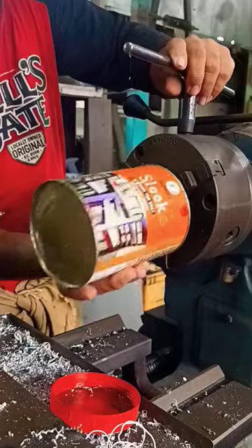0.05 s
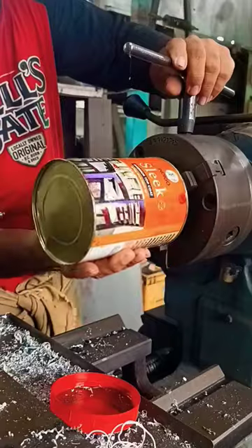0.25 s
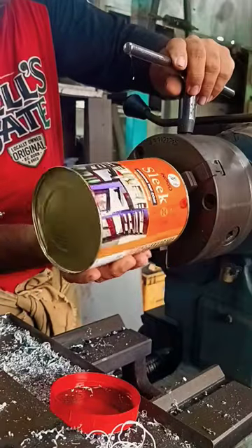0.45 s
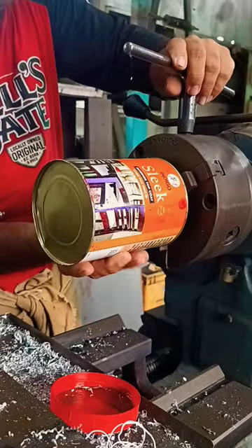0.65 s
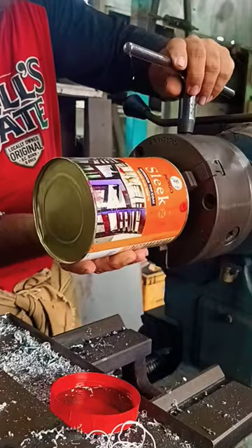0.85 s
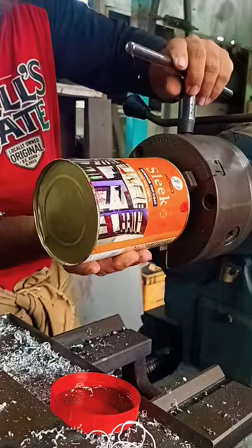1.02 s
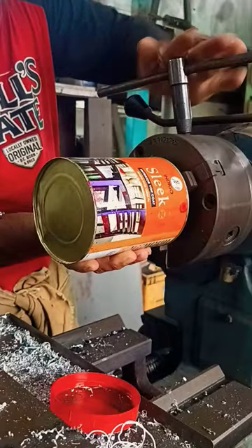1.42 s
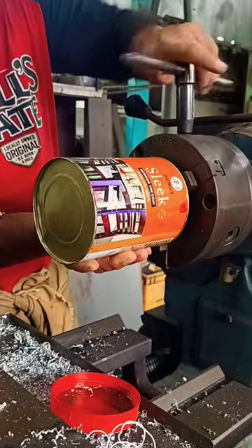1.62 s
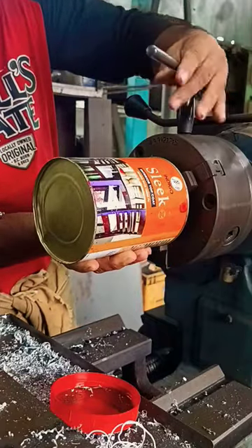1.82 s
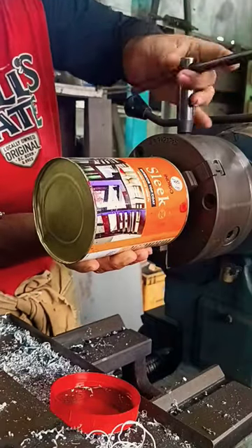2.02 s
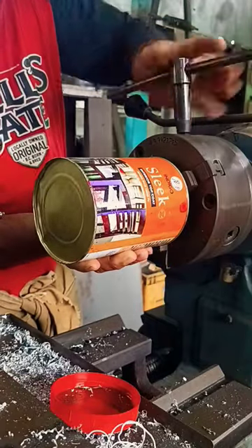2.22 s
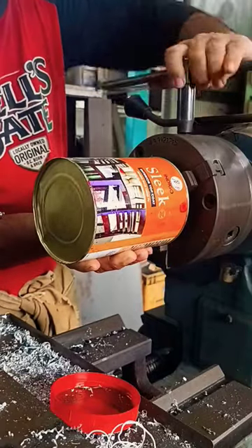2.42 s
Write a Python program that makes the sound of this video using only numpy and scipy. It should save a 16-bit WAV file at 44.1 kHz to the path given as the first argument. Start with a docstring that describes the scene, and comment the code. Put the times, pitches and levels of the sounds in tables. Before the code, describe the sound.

A tin can knocks against steel lathe jaws with hollow clunks, then a key turns quietly.

```python
"""Workshop, close to a standing lathe chuck: a tin can is pushed into the steel jaws.
Each knock gives a hollow thud of the hand-damped can, a clank of steel and a zing of the rim,
which scrapes between knocks. The chuck key turns, closing the jaws on the can with a last clunk
and soft bumps. A hand slides along the key's bar. Low hum and room noise underneath."""
import sys
import numpy as np
from scipy import signal
from scipy.fft import rfft, irfft, next_fast_len
from scipy.io import wavfile
from scipy.ndimage import map_coordinates

SR = 44100
rng = np.random.default_rng(int(sys.argv[2]) if len(sys.argv) > 2 else 0)


def unload_audio(sound):
    """Save the sound as a 16-bit wav file, at the path given as the first command line argument."""
    columns = np.transpose(np.atleast_2d(sound))
    # keep every value between -1 and 1, then stretch to whole-number steps
    steps = np.round(np.clip(columns, -1, 1) * 32767)
    wavfile.write(sys.argv[1], SR, steps.astype(np.int16))


N = 112454

# can against jaws: start_s, thud_db, thud_pitch_hz, thud_hold_s, clank_db, zing_db
KNOCKS = [(0.2238, -13, 361.8, 0.016, -35.5, -35.5), (0.2502, -23, 382, 0.019, -36, -48),
          (0.2984, -21.5, 370, 0.001, -41, -64), (0.4208, -19, 388, 0.0019, -36.5, -47),
          (0.607, -32, 375, 0.0037, -41, -42), (0.6214, -23, 361, 0.0028, -32.5, -70),
          (0.6474, -15.5, 376, 0.0032, -40, -71), (0.715, -12, 367, 0.0016, -19, -49),
          (1.216, -42.5, 425, 0.0024, -45, -63), (1.2262, -32.5, 400, 0.00036, -44, -57),
          (1.2454, -22.5, 371.3, 0.0034, -35.5, -60)]
# metal rubbing on metal: freq_hz, relative_db
RASP_SPECTRUM = [(300, -26), (700, -6), (1050, -3.5), (1650, 3), (2600, -14), (3300, -2), (4800, -12.5),
                 (6000, -9.5), (8000, -18.5), (15000, -27.5)]
# left-right likeness of close sources: freq_hz, correlation
NEAR_CORRELATION = [(300, 0.82), (1500, 0), (5000, 0), (12000, 0.11)]


def amp(db):
    """Decibels to gain."""
    return 10 ** (np.asarray(db) / 20)


def unit_rms(x):
    """Scale to rms 1."""
    return x / np.sqrt(np.mean(x ** 2) + 1e-20)


def curve_at(points, hz):
    """Interpolate (freq_hz, value) points on a log axis."""
    freqs_hz, values = np.transpose(points)
    return np.interp(np.log(hz + 1), np.log(freqs_hz + 1), values)


def clock(start_s=0):
    """Seconds since start_s, zero before it."""
    return np.maximum(np.arange(N) / SR - start_s, 0)


def wobble(knots_per_s):
    """Smooth random curve."""
    return map_coordinates(rng.standard_normal(2048), [clock() * knots_per_s], mode="wrap")


def filtered(x, response):
    """Apply the frequency response response(hz)."""
    size = next_fast_len(N + 8192)
    return irfft(rfft(x, size) * response(np.fft.rfftfreq(size, 1 / SR)), size)[..., :N]


def noise(spectrum):
    """Coloured mono noise, rms 1."""
    return unit_rms(filtered(rng.standard_normal(N), lambda hz: amp(curve_at(spectrum, hz))))


def stereo_noise(spectrum, correlation=NEAR_CORRELATION):
    """Coloured stereo noise, rms 1."""
    def mid_side_gains(hz):
        angle_rad = np.arccos(np.clip(curve_at(correlation, hz), -1, 1)) / 2
        return amp(curve_at(spectrum, hz)) * [np.cos(angle_rad), np.sin(angle_rad)]
    mid, side = filtered(rng.standard_normal((2, N)), mid_side_gains)
    return unit_rms(np.array([mid + side, mid - side]))


def fade(t, t60_s):
    """Exponential decay, 60 dB in t60_s."""
    return np.exp(-np.log(1000) * t / t60_s)


def rise(t, attack_s):
    """Smooth step from 0 to 1."""
    return np.sin(np.pi / 2 * np.clip(t / attack_s, 0, 1)) ** 2


def ring(modes, t, attack_s):
    """Struck metal modes; level and phase vary per blow and per microphone."""
    spread_rad, scatter_db = 0.65, 2
    out, sides = np.zeros((2, N)), np.array([[1], [-1]])
    live = (t > 0) & (t < 0.5)
    age_s = t[live]
    for hz, db, t60_s in modes:
        phase_rad = 2 * np.pi * rng.random() + sides * spread_rad * rng.choice([-1, 1])
        gain = amp(db + scatter_db * rng.standard_normal((2, 1)))
        out[:, live] += gain * fade(age_s, t60_s) * np.sin(2 * np.pi * hz * age_s + phase_rad)
    return out * rise(t, attack_s)


def workshop():
    """Steady room noise and a wavering machine hum."""
    # room noise: freq_hz, relative_db
    air_spectrum = [(25, -41), (60, -14), (110, -9), (143, -2), (175, -9.5), (210, -7.5), (250, -12),
                    (330, -9.5), (600, -11.5), (2600, -13.5), (6300, -21.5), (8000, -26.5), (11000, -28),
                    (15000, -33.5)]
    # its left-right likeness: freq_hz, correlation
    air_correlation = [(60, 0.81), (180, 0.97), (540, 0.54), (1640, -0.096), (4940, -0.096), (14900, 0.015)]
    # machine hum: pitch_hz, rms_db
    hum_partials = [(143, -71.5), (286, -66)]
    air_db, waver_db, waver_rad = -55.5, 2.5, 0.63
    hum = np.zeros(N)
    for hz, db in hum_partials:
        peak = np.sqrt(2) * amp(db + waver_db * wobble(9.5))
        hum += peak * np.sin(2 * np.pi * hz * clock() + waver_rad * wobble(10.78))
    return amp(air_db) * stereo_noise(air_spectrum, air_correlation) + hum


def reverb(x):
    """Short diffuse room tail, different at each microphone."""
    # room decay: freq_hz, t60_s
    decay_times = [(150, 0.13), (500, 0.13), (3000, 0.093), (12000, 0.046)]
    predelay_s, reverb_db = 0.007, -17
    hz, t, bands = signal.stft(rng.standard_normal((2, SR // 2)), SR, nperseg=256)
    bands = bands * fade(t, curve_at(decay_times, hz)[:, None])
    tail = signal.istft(bands, SR, nperseg=256)[1]
    tail /= np.linalg.norm(tail[0])
    delayed = np.pad(x, ((0, 0), (int(predelay_s * SR), 0)))
    return amp(reverb_db) * signal.fftconvolve(delayed, tail, axes=1)[:, :N]


def hand_slide():
    """Skin brushes along the key's bar, brighter when it moves faster."""
    # slide envelope: time_s, relative_db
    contour = [(2.304, -61.5), (2.335, -48), (2.36, -49.5), (2.387, -48.5), (2.405, -53), (2.47, -55),
               (2.55, -64.5)]
    # brushing skin: freq_hz, relative_db
    skin_spectrum = [(300, -2), (700, -5.5), (1300, 3), (4000, 1.5), (6500, -3), (10000, -16.5),
                     (15000, -27)]
    # hiss of fast sliding: freq_hz, relative_db
    sizzle_spectrum = [(2000, -30), (5000, 5), (7000, -3.5), (10000, -5.5), (15000, -16.5)]
    slide_db, flutter_db, sizzle_db, sizzle_exponent = -45, 0.46, -6.5, 3.5
    times_s, levels_db = np.transpose(contour)
    envelope_db = np.interp(clock(), times_s, levels_db - levels_db.max()) + flutter_db * wobble(170)
    envelope = amp(envelope_db) * rise(clock(times_s[0]), attack_s=0.019)
    sizzle = amp(sizzle_db) * envelope ** sizzle_exponent * stereo_noise(sizzle_spectrum)
    brush = envelope * stereo_noise(skin_spectrum)
    return amp(slide_db) * (brush + sizzle)


def chuck_key():
    """The turning key bumps, ticks and clunks in the heavy chuck; its bar clicks."""
    # play in the socket: start_s, bump_db, pitch_hz, t60_s, tick_db
    bumps = [(.968, -50, 364, 0.1, -54.5), (1.219, -44, 220, .1, -50), (1.27, -45.5, 147.3, 0.37, -68),
             (1.352, -50, 147, 0.27, -80), (1.397, -48, 290, 0.063, -50.5), (1.648, -35, 201, 0.044, -53.5),
             (1.696, -45.5, 437, 0.047, -53.5), (1.712, -51, 144, 0.23, -60),
             (1.808, -55, 143.2, 0.64, -76), (1.936, -44.5, 326, 0.12, -53), (2.105, -68, 295, .08, -52),
             (2.379, -43, 297, 0.11, -80), (2.386, -56, 84.5, 0.11, -71)]
    # the key clunks and its bar clicks: start_s, level_db, pitch_hz
    key_clicks = [(1.222, -41, 830), (1.249, -37, 860), (1.398, -44, 2370), (2.11, -52, 3520),
                  (2.536, -38, 4480)]
    click_t60_s = 0.018
    out, rasp = np.zeros((2, N)), stereo_noise(RASP_SPECTRUM)
    for start_s, bump_db, hz, t60_s, tick_db in bumps:
        t = clock(start_s)
        bump = amp(bump_db) * np.sin(2 * np.pi * hz * t) * fade(t, t60_s)
        tick = amp(tick_db) * rasp * fade(t, t60_s=0.1)
        out += rise(t, attack_s=0.0034) * (bump + tick)
    for start_s, db, hz in key_clicks:
        out += ring([(hz, db, click_t60_s)], clock(start_s), attack_s=0.00083)
    return out


def rim_scrapes():
    """The dragging rim rasps unevenly and keeps the can droning."""
    # rim over the jaws: start_s, length_s, drone_db, rasp_db
    strokes = [(0.309, .06, -42, -58.5), (0.373, 0.063, -42.5, -53), (0.437, 0.025, -43, -57),
               (0.614, 0.0525, -36, -47.5), (0.679, 0.03, -34, -54.5), (0.732, 0.031, -36, -54.5)]
    # droning can: freq_hz, relative_db
    drone_spectrum = [(100, -61), (180, -9.5), (220, -4.5), (265, -9), (345, -0.5), (440, -0.5),
                      (520, -15.5), (700, -31), (2000, -61)]
    roughness_db = 2.4
    drone = noise(drone_spectrum)
    rasp = unit_rms(stereo_noise(RASP_SPECTRUM) * amp(roughness_db * wobble(260)))
    out = np.zeros((2, N))
    for start_s, length_s, drone_db, rasp_db in strokes:
        envelope = rise(clock(start_s), attack_s=0.0059) * fade(clock(start_s + length_s), t60_s=0.03)
        out += envelope * (amp(drone_db) * drone + amp(rasp_db) * rasp)
    return out


def jaw_clanks():
    """Each contact cracks and rings the metal; the rim's edge adds a snap and a zing."""
    # can seated in the jaws: pitch_hz, relative_db, t60_s
    clank_modes = [(854, -16.5, .06), (1014, -3.5, 0.059), (1230, -17, 0.03), (1472, -14, 0.1),
                   (1709, -3, 0.061), (1809, -3.5, 0.061), (1975, -4.5, 0.052), (2223, -2.5, 0.042),
                   (2480, -6.5, .045), (3164, -2, 0.037), (3204, 0, 0.055), (3463, -2.5, 0.03),
                   (3680, -6.5, 0.043), (4180, -10, 0.042)]
    # can rim: pitch_hz, relative_db, t60_s
    rim_modes = [(697, -4, .08), (974, 1.5, 0.063), (1745, 4, 0.028), (3190, 6, 0.071), (3580, -7, 0.04),
                 (4340, -10, 0.1), (5683, 5.5, 0.054), (6035, 8.5, 0.027), (5830, -9, 0.034),
                 (7290, -15.5, 0.055), (10070, -7.5, 0.029), (11000, -14, 0.028)]
    # contact noise: freq_hz, relative_db
    crack_spectrum = [(60, -35), (200, -28), (700, -10.5), (1500, 5.5), (2300, 1.5), (3400, -3), (4300, -7),
                      (5200, -16), (8000, -33.5), (15000, -33)]
    # sharp rim edge: freq_hz, relative_db
    snap_spectrum = [(1500, -25), (3200, -7), (4800, -8), (6100, 11.5), (8000, -16), (11000, -4.5),
                     (15000, -40)]
    clank_modes_db, rim_modes_db, crack_db, snap_db = -6, -3.5, -8.5, -7
    soft_attack_s, soft_clank_db, attack_halving_db = 0.0031, -31.5, 11
    crack_noise = amp(crack_db) * stereo_noise(crack_spectrum)
    snap_noise = amp(snap_db) * stereo_noise(snap_spectrum)
    out = np.zeros((2, N))
    for start_s, _, _, _, clank_db, zing_db in KNOCKS:
        t = clock(start_s)
        # harder knock, shorter contact
        attack_s = soft_attack_s * 0.5 ** ((clank_db - soft_clank_db) / attack_halving_db)
        crack = crack_noise * rise(t, attack_s) * fade(t, t60_s=0.087)
        snap = snap_noise * rise(t, attack_s) * fade(t, t60_s=0.077)
        out += amp(clank_db) * (amp(clank_modes_db) * ring(clank_modes, t, attack_s) + crack)
        out += amp(zing_db) * (amp(rim_modes_db) * ring(rim_modes, t, attack_s) + snap)
    return out


def can_thuds():
    """The can booms while pressed on a jaw, then rings on faintly in the hand."""
    # air and walls of the can: pitch_hz, relative_db, t60_s
    can_modes = [(217.5, -20, 0.13), (346, -15, 0.16), (419, -8.5, 0.099), (530, -27, 0.081),
                 (633, -39, 0.07)]
    attack_s = 0.0043
    out = np.zeros(N)
    for start_s, thud_db, pitch_hz, hold_s, _, _ in KNOCKS:
        t = clock(start_s)
        release = fade(clock(start_s + attack_s + hold_s), t60_s=0.029)
        pressed = np.sin(2 * np.pi * pitch_hz * t) * rise(t, attack_s) * fade(t, t60_s=0.46) * release
        free = sum(amp(db) * np.sin(2 * np.pi * hz * t) * fade(t, t60_s) for hz, db, t60_s in can_modes)
        out -= amp(thud_db) * (pressed + free * rise(t, attack_s=0.016))
    return out


def scene():
    """Stereo mix; the thuds reach the right microphone slightly earlier."""
    right_lead_s = 0.00014
    delays_s = np.array([[0.5], [-0.5]]) * right_lead_s
    thuds = filtered(can_thuds(), lambda hz: np.exp(-2j * np.pi * hz * delays_s))
    chuck = thuds + jaw_clanks() + rim_scrapes() + chuck_key()
    return chuck + reverb(chuck) + hand_slide() + workshop()


def record(dry):
    """Fade in from silence, then low-pass."""
    cutoff_hz = 15450
    fade_in = rise(clock(start_s=0.085), attack_s=0.031)
    return filtered(dry * fade_in, lambda hz: hz < cutoff_hz)


dry = scene()
out = record(dry)
unload_audio(out)
```